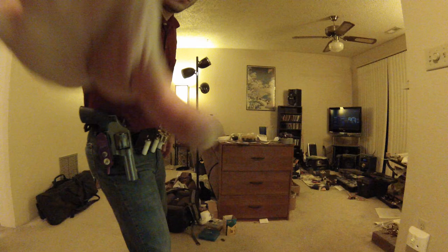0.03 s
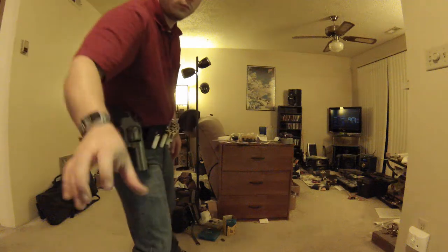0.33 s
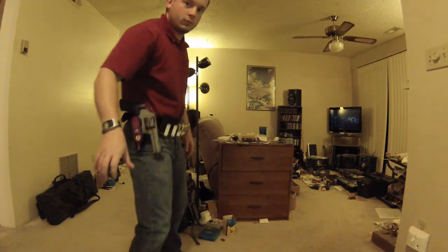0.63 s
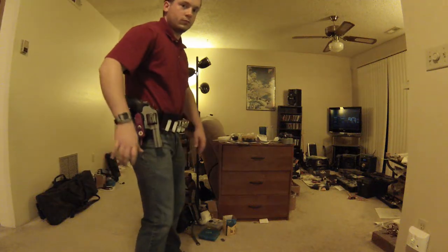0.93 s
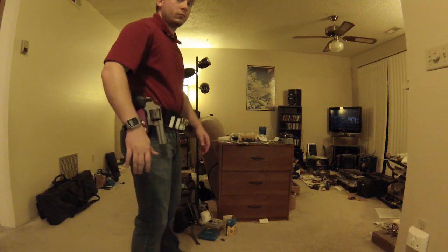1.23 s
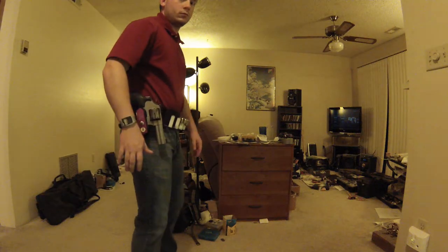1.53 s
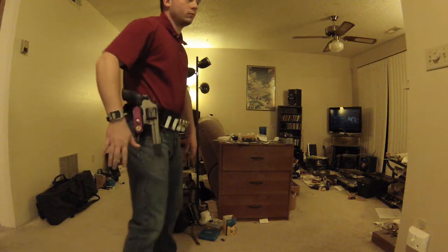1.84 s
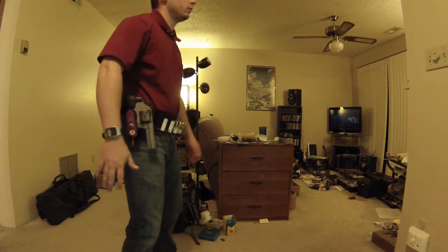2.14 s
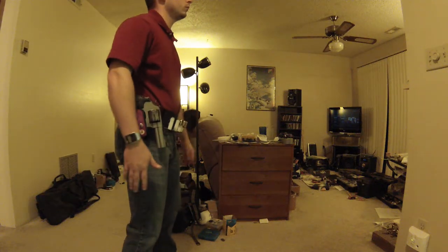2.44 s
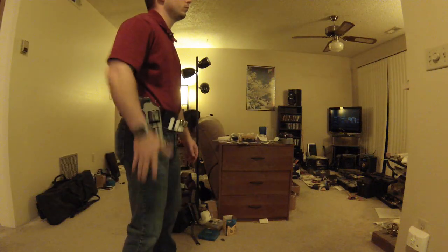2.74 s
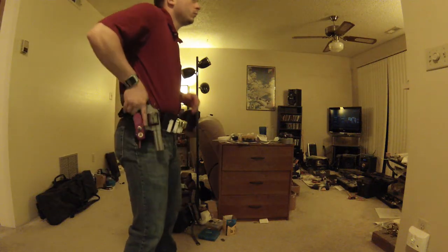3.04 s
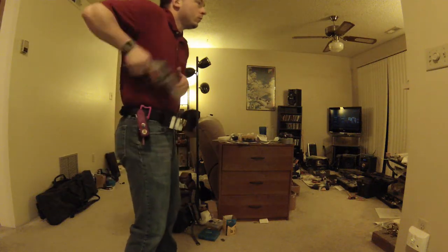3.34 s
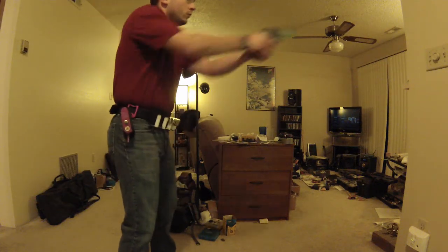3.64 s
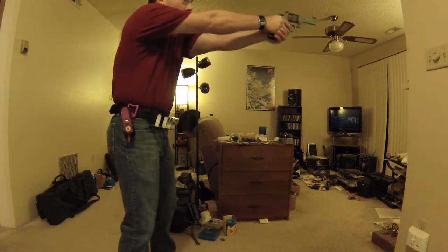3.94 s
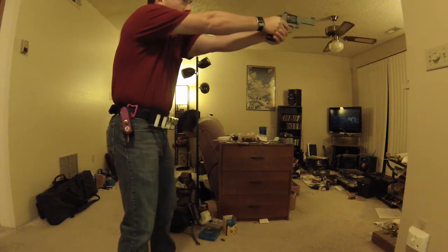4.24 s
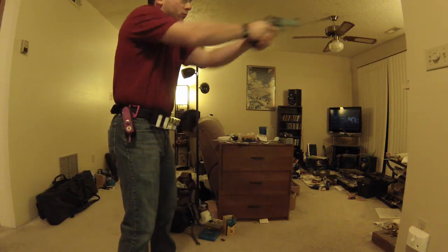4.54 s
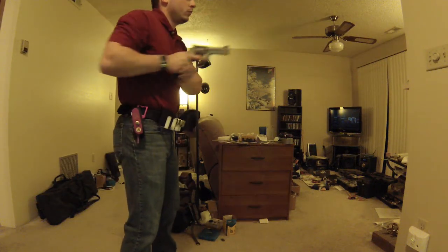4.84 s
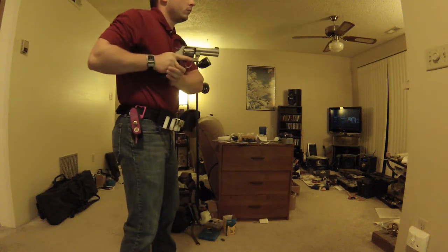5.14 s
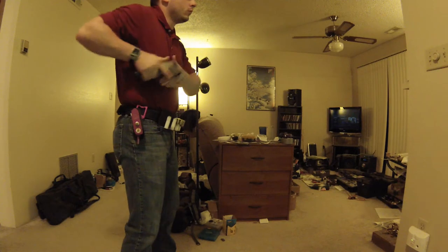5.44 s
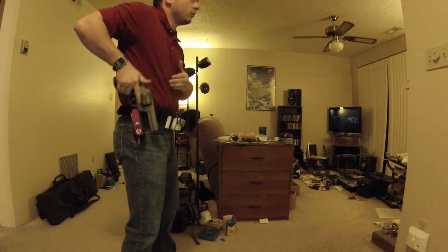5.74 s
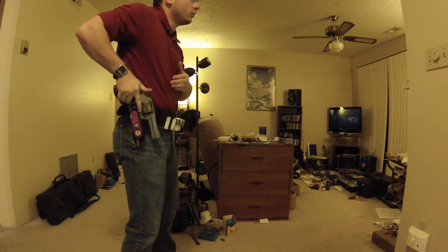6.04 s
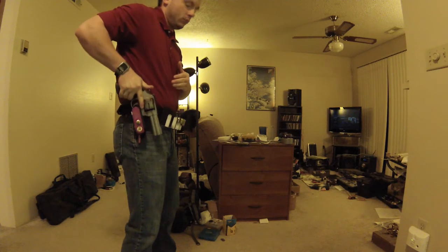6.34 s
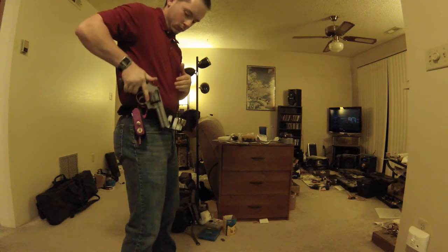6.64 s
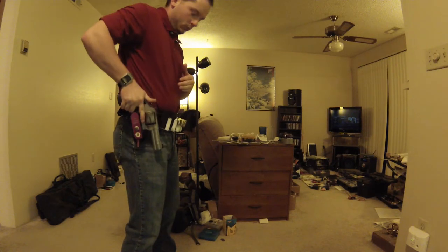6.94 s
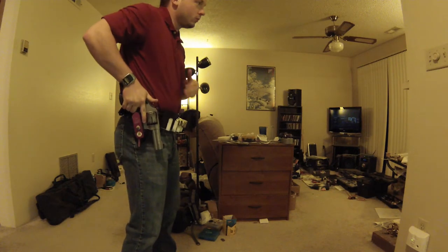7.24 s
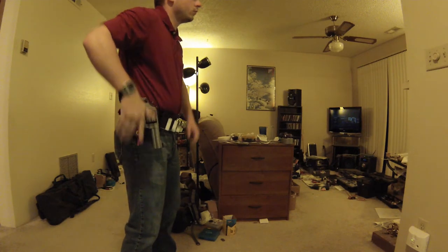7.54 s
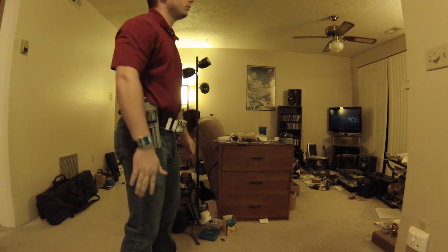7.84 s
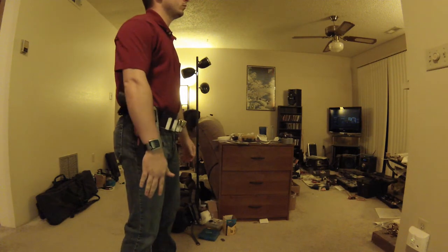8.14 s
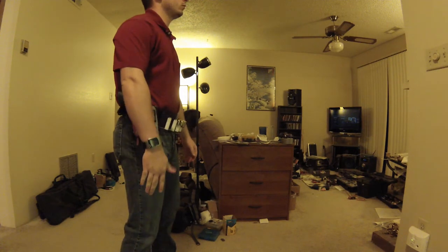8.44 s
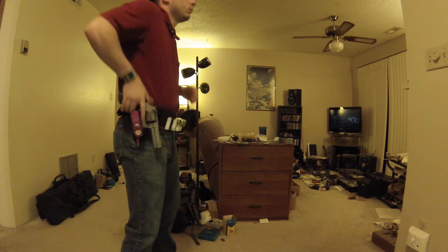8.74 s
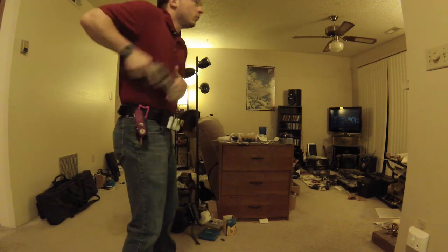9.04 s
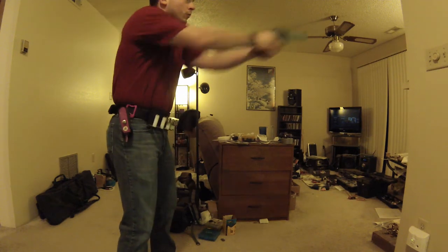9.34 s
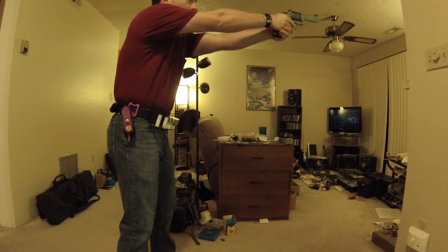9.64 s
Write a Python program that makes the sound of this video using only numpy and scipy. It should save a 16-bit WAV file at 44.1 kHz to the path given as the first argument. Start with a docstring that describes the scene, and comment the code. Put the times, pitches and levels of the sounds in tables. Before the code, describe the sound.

A quiet carpeted living room gives a steady low rumble under faint hiss and a thin electronic whine. In the first two seconds the microphone's stand wobbles with a very deep shudder and ticks twice, clothing brushes, and a few soft footsteps thud through the floor. At about 3.2 seconds a catch snaps open and a revolver scrapes briefly and clacks out of a hard holster. At 4.0 and 4.3 seconds it is dry-fired twice: sharp metallic clicks, the clearest sounds here, each with a short steel ring, a slight room echo and a fainter click of the trigger returning. The gun clacks against the holster at 5.8 and 6.4 seconds, then is pushed home with a quick cluster of light knocks from 6.8 to 7 seconds. Only the background remains until about 9 seconds, when the catch pings and the gun clacks out again.

```python
"""A quiet carpeted living room rumbles under the hiss and thin whine of a camera's electronics.
At first the camera stand sways from a touch, ticks, and thuds softly as steps shake the floor; cloth brushes.
Near 3 s a catch snaps open and a revolver scrapes and clacks out of a hard holster, ringing its shell.
Just after 4 s it is dry-fired twice: the lock clicks, and each hammer fall sets the steel frame ringing.
From about 6 s it is knocked home into the holster, and near 9 s it is drawn again."""
import sys
import numpy as np
from scipy import signal
from scipy.fft import rfft, irfft, next_fast_len
from scipy.io import wavfile
from scipy.ndimage import uniform_filter1d

SR = 44100
rng = np.random.default_rng(int(sys.argv[2]) if len(sys.argv) > 2 else 0)


def store_wav(level_fs):
    """Save 16-bit WAV to argv[1]."""
    pcm = np.round(np.clip(np.atleast_2d(level_fs), -1, 1) * 32767)
    wavfile.write(sys.argv[1], SR, pcm.T.astype(np.int16))


N = 426888
TIME = np.arange(N) / SR
HIT_TIME = TIME[:SR // 2]
START_S, CUTOFF_HZ = .1055, 15300

# noise spectra of room, electronics and cloth: (frequency [Hz], relative density [dB])
RUMBLE_SPECTRUM = [(12, -23), (20, 0), (65, -4), (72, -8), (81, -9.5), (109, -12), (162, -13), (185, -16),
                   (682, -25), (730, -24.5), (1200, -32), (1560, -80), (2640, -120)]
HISS_SPECTRUM = [(600, -9), (1200, 2), (2400, 0), (4500, -2.5), (6000, -2.5), (9000, -5.5), (10600, -6),
                 (11300, -1.5), (12700, -10), (13500, -5), (15200, -12)]
CLOTH_SPECTRUM = [(120, 3.5), (300, 3.5), (550, 4), (900, -7.5), (2000, -21), (6000, -19), (14000, -33)]
RUMBLE_DB, HISS_DB = -60.5, -68.5
# tones of the electronics: (frequency [Hz], rms wander [Hz], level [dB])
WHINE_TONES = [(4376, 2, -90.5), (11080, 16, -90), (12558, 4, -94), (13067, 5, -84), (13127, 6, -87.5)]
# likeness of the two channels in noise and in reverberation: (frequency [Hz], correlation [0-1])
NOISE_COHERENCE = [(100, 1), (350, 0.99), (1400, 0.9), (3000, 0.75), (6000, 0.6), (10000, 0.56),
                   (13000, 0.87)]
REVERB_COHERENCE = [(1000, 1), (2500, 1), (6000, 1), (10000, 1), (14000, 0.96)]
# early reflections from ceiling, walls and dresser: (delay [s], relative gain [ratio])
REFLECTIONS = [(.0056, 0.39), (.0069, 0.3), (0.012, .6), (0.0177, 0.089)]
# reverberation time of the room: (frequency [Hz], t60 [s])
REVERB_TIMES = [(1000, 0.47), (1900, 0.44), (2500, 0.39), (5000, 0.36), (9000, 0.23), (15000, 0.11)]
# movements of shirt and sleeve: (time [s], length [s], level [dB])
CLOTH_MOVES = [(0, 0.53, -69), (.8, 0.31, -73.5), (3.05, 0.17, -79.5)]
CLOTH_ATTACK_S, CLOTH_T60_S = 0.12, 2.3

# jolts that set the stand nodding: (time [s], peak level [dB])
STAND_JOLTS = [(0.103, -40.5), (.957, -38), (1.859, -42.5)]
ROCK_DB, ROCK_MODE, NOD_MODE = -25, (28.44, 5.2), (44.8, 2.16)   # modes: (frequency [Hz], t60 [s])
# steps felt through the floor: (time [s], relative level [dB], extra gain of the highest mode [dB])
FLOOR_THUDS = [(0.738, -39, -6), (0.763, -44.5, -1), (.963, -40.5, -5.5), (1.47, -52.5, -8),
               (1.758, -40.5, -13.5), (1.876, -50, 3.5)]
# ticks of the settling stand: (time [s], relative level [dB])
STAND_TICKS = [(0.395, -54), (0.8725, -58.5)]
THUD_RISE_S, TICK_CHATTER_S = 0.01, .003

# normal modes of the stand's legs and ticking parts, the holster's shell and catch spring,
# and the revolver's lock and frame: (frequency [Hz], relative level [dB], t60 [s])
LEG_MODES = [(100.2, -10.5, 0.92), (141.2, 2.5, 0.15), (161.4, 5, 0.45)]
TICK_MODES = [(1390, -2, .025), (1580, -2, .025), (1800, 1, .025)]
SHELL_MODES = [(1520, -11, .04), (2100, 0, .07), (2230, -3, .05), (2400, -1, .08), (2520, -2, .07),
               (3100, -7, .04), (3700, -10, .035), (6100, -9, .04), (6350, -6.5, .04), (7750, -7.5, .06)]
SPRING_MODES = [(2026, -3, .07), (3070, 0, 0.078), (3150, -8, 0.031), (5400, -15, 0.027),
                (5880, -4.5, 0.04), (6150, 1, 0.016), (6630, -3, .02), (7950, -9, .04)]
LOCK_MODES = [(2372, 1, 0.024), (2574, -2.5, 0.034), (2860, -9, .03), (4380, -8, .05), (5050, -6, .04),
              (5170, -9, .05), (6020, -5, .06)]
FRAME_MODES = [(1600, -1, .16), (1766, -1.5, .32), (2024, -3.5, .25), (2353, -2.5, .18), (2510, -6, .15),
               (3000, -5, .2), (3520, -10, .15), (3860, -12, .2), (4188, -5, .22), (5378, -10, .18),
               (5975, -7, .15), (6444, -4, .13), (7690, -4, .11), (10790, -8, .13)]
# spectra of each contact's crack and of sliding friction: (frequency [Hz], relative density [dB])
TICK_CRACK = [(500, -14), (1300, -3), (1750, 0), (2300, -16), (8000, -30)]
SHELL_CRACK = [(300, -18), (1100, -6.5), (1800, 0.5), (2150, -4.5), (2550, 1), (2850, 1), (3200, 2),
               (4500, -5.5), (6300, -4), (9000, -14.5), (15000, -24)]
SPRING_CRACK = [(300, -12), (1100, -6), (2100, 2), (2600, 1), (5000, -7), (6250, 0.5), (7200, -4),
                (11000, -7), (15000, -21)]
LOCK_CRACK = [(300, -28), (1600, -10), (2000, 0), (2450, 1), (3100, -3), (4400, 2), (6100, 4), (8000, -2),
              (9200, -7), (15000, -22)]
STEEL_CRACK = [(300, -17), (800, -20), (1300, -4.5), (1750, 1.5), (2350, 4.5), (2750, -0.5), (4300, 0.5),
               (5200, -1.5), (6300, 2), (7100, -5), (7700, 1.5), (8600, -7.5), (12000, -8), (15000, -20)]
SCRAPE_SPECTRUM = [(500, -12), (1400, 1), (2100, 4.5), (3400, -6), (4400, -16), (6300, 0), (9000, -10),
                   (15000, -34)]

# steel rubbing along the shell: (time [s], length [s], level [dB], favoured frequency [Hz])
HOLSTER_SCRAPES = [(3.201, .04, -79, 2900), (3.272, 0.064, -76, 2450), (6.403, .036, -76, 3000),
                   (6.911, 0.033, -78, 2500), (8.998, .032, -79, 3450)]
# the catch opening at each draw: (time [s], relative level [dB])
CATCH_RELEASES = [(3.2205, -55), (8.9497, -46)]
SLIPS_PER_S, CATCH_CHATTER_S = 1500, 0.0023
# the gun touching both walls of the holster's mouth: (second contact time [s], relative level [dB],
# first against second [dB], tilt [dB/octave], second's favoured frequency [Hz], its width [octaves])
MOUTH_CLACKS = [(3.303, -50, -2, 3, 2150, .15), (5.7735, -49, -4, 3, 2400, .15),
                (6.4254, -52.5, -4, -1, 2850, 0.61), (9.0016, -48, -.5, 0, 2440, 0.1)]
CLACK_GAP_S, CLACK_CHATTER_S, FIRST_WALL_HZ, FIRST_WALL_OCTAVES = 0.011, 0.006, 2090, .1
# the gun being pushed home:
# (time [s], relative level [dB], tilt [dB/octave], crack against ring [dB], favoured frequency [Hz])
SEATING_KNOCKS = [(6.7735, -50.5, -2.5, 6, 2140), (6.818, -53, -2, 1, 2240), (6.8465, -45, -3.5, -2, 2140),
                  (6.8525, -50.5, -1.5, -2, 2270), (6.9185, -53, -8, -7, 2530),
                  (6.9465, -49, 0.5, 12, 2450)]
KNOCK_CHATTER_S, GRIPPED_T60_SHARE = 0.0045, 0.5
SLIDE_IN_S = 0.0011   # sliding into a contact softens its attack

# double-action pulls: (hammer fall time [s], relative level [dB], cylinder stop against hammer [dB],
# sear against hammer [dB], trigger held [s], tilt [dB/octave], favoured low and high frequency [Hz])
TRIGGER_PULLS = [(4.0303, -41.5, -11, -8, .123, -0.4, 2020, 6440),
                 (4.308, -40.6, -6.5, -2, .103, 0.45, 2370, 7690)]
STOP_LEAD_S, SEAR_LEAD_S, SEAR_HZ = 0.013, .0062, 2440
REBOUND_S, REBOUND_DB, RETURN_DB = 0.0048, -9, -16.5
# contacts within the lock: (tilt [dB/octave], chatter time [s])
STOP_CONTACT, SEAR_CONTACT = (2.1, 0.0032), (-5.5, 0.0033)
HAMMER_CONTACT, REBOUND_CONTACT, RETURN_CONTACT = (0, 0.017), (1.5, 0.0051), (1.5, 0.0073)


def from_db(db):
    """Amplitude grows tenfold for every 20 dB."""
    return 10 ** (np.asarray(db) / 20)


def unit_rms(x):
    """Normalisation to unit mean power."""
    return x / np.sqrt(np.mean(x ** 2) + 1e-30)


def unit_energy(x):
    """Normalisation to the energy of a unit impulse."""
    return x / np.sqrt(np.sum(x ** 2) + 1e-30)


def at_hz(points, hz):
    """Linear interpolation on a log-frequency axis."""
    known_hz, value = np.transpose(points)
    return np.interp(np.log(np.maximum(hz, 1)), np.log(known_hz), value)


def bell(hz, centre_hz, octaves):
    """Gaussian weighting in log frequency, 1 at its centre."""
    return np.exp(-(np.log2(np.maximum(hz, 1) / centre_hz) / octaves) ** 2)


def decay(t, t60):
    """Exponential decay, 60 dB in t60."""
    return np.exp(-np.log(1000) * t / max(t60, 1e-4))


def mode(t, hz, t60):
    """Free vibration of a damped harmonic oscillator."""
    return np.sin(2 * np.pi * hz * t) * decay(t, t60)


def bins(size):
    """Frequencies of the discrete Fourier transform."""
    return np.arange(size // 2 + 1) * SR / size


def colour(x, gain_db):
    """Minimum-phase filtering: folding the cepstrum makes the response causal."""
    size = len(x)
    cepstrum = irfft(np.log(from_db(gain_db)), size)
    cepstrum[1:size // 2] *= 2
    cepstrum[size // 2 + 1:] = 0
    return irfft(rfft(x) * np.exp(rfft(cepstrum)), size)


def stereo_noise(spectrum=None, coherence=NOISE_COHERENCE, size=N):
    """Partial coherence: two channels share one noise and take another in opposite phase."""
    padded = next_fast_len(size, True)
    hz = bins(padded)
    mid, side = rfft(rng.standard_normal((2, padded)))
    alike = np.clip(at_hz(coherence, hz), 0, 1)
    pair = np.sqrt(1 + alike) * mid + np.sqrt(1 - alike) * side * [[1], [-1]]
    gain = 1 if spectrum is None else from_db(at_hz(spectrum, hz))
    return unit_rms(irfft(pair * gain, padded)[:, :size])


def add(out, s, sound):
    """Superposition of a sound that begins at time s."""
    start = int(np.clip(s * SR, 0, N - 1))
    out[start:start + len(sound)] += sound[:N - start]


def impacts(events, modes, crack, crack_db, gain_db, favour_db=0, favour_octaves=1, rise_s=0):
    """Impact excitation: hard faces chatter briefly and leave the body's normal modes ringing."""
    out, t, hz = np.zeros(N), HIT_TIME, bins(len(HIT_TIME))
    octaves = np.log2(np.clip(hz, 1000, 10000) / 3000)
    for s, db, tilt, chatter_s, *favoured_hz in events:
        chatter = rng.standard_normal(len(t)) * np.exp(-t / chatter_s)
        snap = unit_energy(colour(chatter, at_hz(crack, hz)))
        signs = rng.choice([-1, 1], len(modes))
        ring = sum(sign * from_db(mode_db) * unit_energy(mode(t, f, t60))
                   for sign, (f, mode_db, t60) in zip(signs, modes))
        # harder contacts are brighter, and the struck spot may favour some modes
        favour = favour_db * sum(bell(hz, f, favour_octaves) for f in favoured_hz)
        hit = colour(unit_energy(ring) + from_db(crack_db) * snap, tilt * octaves + favour)
        attack = 1 - np.exp(-t / max(rise_s, 1e-6))
        add(out, s, from_db(db + gain_db) * unit_energy(hit * attack))
    return out


def room_rumble():
    """Stationary noise with its power at low frequencies."""
    return from_db(RUMBLE_DB) * stereo_noise(RUMBLE_SPECTRUM)


def electronics():
    """Broadband hiss and thin tones under slight random frequency modulation."""
    out = from_db(HISS_DB) * stereo_noise(HISS_SPECTRUM)
    for hz, wander_hz, db in WHINE_TONES:
        pitch = hz + wander_hz * unit_rms(uniform_filter1d(rng.standard_normal(N), size=2000))
        out += from_db(db) * np.sqrt(2) * np.sin(2 * np.pi * np.cumsum(pitch) / SR)
    return out


def living_room(x, direct_db, echo_db, tail_db, build_s, smear_s):
    """Convolution with a room response: direct sound, reflections, a tail that loses treble first."""
    t = HIT_TIME
    diffuse = rfft(stereo_noise(coherence=REVERB_COHERENCE, size=len(t)))
    hz, centres = bins(len(t)), [f for f, _ in REVERB_TIMES]
    tail = 0
    for band, (_, t60) in zip(np.eye(len(centres)), REVERB_TIMES):
        band_gain = at_hz(list(zip(centres, band)), hz)
        tail += irfft(diffuse * band_gain, len(t)) * decay(t, t60)
    build_up = 1 - np.exp(-(t / build_s) ** 2)
    response = from_db(tail_db) * unit_energy(tail * build_up)
    response[:, 0] += from_db(direct_db)
    for delay, gain in REFLECTIONS:   # furniture smears each one
        bounce = unit_energy(rng.standard_normal(len(t)) * np.exp(-t / smear_s))
        response += from_db(echo_db) * gain * np.roll(bounce, int(delay * SR))
    return signal.fftconvolve(x[None], response, axes=1)[:, :N]


def clothing(uneven_db):
    """Friction noise: cloth slides in uneven pulls, and each movement swells, holds and dies away."""
    pulls = unit_rms(uniform_filter1d(rng.standard_normal(N), size=1200))
    motion = np.zeros(N)
    for s, length, db in CLOTH_MOVES:
        swell = np.clip((TIME - s) / CLOTH_ATTACK_S, 0, 1)
        release = decay(np.maximum(TIME - s - length, 0), CLOTH_T60_S)
        motion = np.maximum(motion, from_db(db) * swell * release)
    return motion * from_db(uneven_db * np.tanh(pulls)) * stereo_noise(CLOTH_SPECTRUM)


def stand_sway():
    """Lightly damped bending modes: a touch leaves the stand rocking, and jolts set it nodding."""
    out = np.zeros(N)
    add(out, START_S, from_db(ROCK_DB) * mode(TIME, *ROCK_MODE))
    for s, db in STAND_JOLTS:
        add(out, s, from_db(db) * mode(TIME, *NOD_MODE))
    return out


def floor_thuds(carpet_hz):
    """Structure-borne sound: steps excite the stand's legs, with the carpet as a low-pass filter."""
    out, t = np.zeros(N), TIME[:SR]
    for s, db, top_db in FLOOR_THUDS:
        ring = sum(from_db(mode_db + extra_db) * mode(t, hz, t60)
                   for (hz, mode_db, t60), extra_db in zip(LEG_MODES, (0, 0, top_db)))
        add(out, s, from_db(db) * ring * (1 - np.exp(-t / THUD_RISE_S)))
    return signal.sosfilt(signal.butter(6, carpet_hz, fs=SR, output="sos"), out)


def stand_ticks():
    """Heavily damped modes give small dry ticks as the stand settles."""
    ticks = [(s, db, 0, TICK_CHATTER_S) for s, db in STAND_TICKS]
    return impacts(ticks, TICK_MODES, TICK_CRACK, crack_db=2.0, gain_db=13.5)


def holster_scrapes(favour_db, favour_octaves):
    """Stick-slip friction: steel on the shell gives a dense run of tiny slips that swells and stops."""
    out, t, hz = np.zeros(N), HIT_TIME, bins(len(HIT_TIME))
    for s, length, db, favoured_hz in HOLSTER_SCRAPES:
        slips = rng.standard_normal(len(t)) * (rng.random(len(t)) < SLIPS_PER_S / SR)
        favour = favour_db * bell(hz, favoured_hz, favour_octaves)
        rasp = unit_rms(colour(slips, at_hz(SCRAPE_SPECTRUM, hz) + favour))
        add(out, s, from_db(db) * rasp * np.sin(np.pi * np.minimum(t / length, 1)))
    return out


def holster_catch():
    """Sudden release leaves the catch's steel spring in free vibration."""
    pings = [(s, db, 0, CATCH_CHATTER_S) for s, db in CATCH_RELEASES]
    return impacts(pings, SPRING_MODES, SPRING_CRACK, crack_db=0.0, gain_db=7.5, rise_s=0.00071)


def holster_clacks():
    """Shell resonance: the gun strikes one wall of the mouth, then the other, and both ring freely."""
    walls = []
    for s, db, first_db, tilt, hz, octaves in MOUTH_CLACKS:
        walls.append((s - CLACK_GAP_S, db + first_db, tilt, FIRST_WALL_HZ, FIRST_WALL_OCTAVES))
        walls.append((s, db, tilt, hz, octaves))
    return sum(impacts([(s, db, tilt, CLACK_CHATTER_S, hz)], SHELL_MODES, SHELL_CRACK, crack_db=3.0,
                       gain_db=7.5, favour_db=9.0, favour_octaves=octaves, rise_s=SLIDE_IN_S)
               for s, db, tilt, hz, octaves in walls)


def holster_knocks():
    """Contact damping: the wedged gun shortens the shell's ring as it is knocked home."""
    gripped = [(hz, db, t60 * GRIPPED_T60_SHARE) for hz, db, t60 in SHELL_MODES]
    return sum(impacts([(s, db, tilt, KNOCK_CHATTER_S, hz)], gripped, SHELL_CRACK, crack_db,
                       gain_db=7.5, favour_db=8.5, favour_octaves=0.061, rise_s=SLIDE_IN_S)
               for s, db, tilt, crack_db, hz in SEATING_KNOCKS)


def frame_ring(gain_db, favour_db, favour_octaves):
    """Modal decay of the frame after each hammer fall; each chamber favours its own low and high mode."""
    out = np.zeros(N)
    for s, db, *_, low_hz, high_hz in TRIGGER_PULLS:
        for hz, mode_db, t60 in FRAME_MODES:
            favour = favour_db * (bell(hz, low_hz, favour_octaves) + bell(hz, high_hz, favour_octaves))
            amplitude = rng.choice([-1, 1]) * from_db(db + gain_db + mode_db + favour)
            add(out, s, amplitude * mode(HIT_TIME, hz, t60))
    return out


def dry_fire():
    """A chain of impacts: the cylinder locks, the sear slips, the hammer bounces, the trigger returns."""
    stops, sears, blows = [], [], []
    for s, db, stop_db, sear_db, held_s, tilt, low_hz, high_hz in TRIGGER_PULLS:
        stops.append((s - STOP_LEAD_S, db + stop_db, *STOP_CONTACT))
        sears.append((s - SEAR_LEAD_S, db + sear_db, *SEAR_CONTACT, SEAR_HZ))
        steps = [(0, 0, HAMMER_CONTACT, low_hz),
                 (REBOUND_S, REBOUND_DB, REBOUND_CONTACT, high_hz),
                 (held_s, RETURN_DB, RETURN_CONTACT, low_hz)]
        for lag_s, step_db, (step_tilt, chatter_s), hz in steps:
            blows.append((s + lag_s, db + step_db, tilt + step_tilt, chatter_s, hz))
    return (impacts(stops, LOCK_MODES, LOCK_CRACK, crack_db=2.0, gain_db=13.5)
            + impacts(sears, LOCK_MODES, LOCK_CRACK, crack_db=0.0, gain_db=14.0,
                      favour_db=6.0, favour_octaves=0.21, rise_s=0.0014)
            + impacts(blows, LOCK_MODES, STEEL_CRACK, crack_db=23.0, gain_db=12.3,
                      favour_db=4.5, favour_octaves=.2))


def scene():
    """Superposition: lock and holster reverberate in the room, and all other sounds add directly."""
    lock = living_room(dry_fire(), direct_db=9.5, echo_db=1.0, tail_db=6.0, build_s=0.003, smear_s=0.0013)
    holster = holster_knocks() + holster_clacks() + holster_catch()
    holster += holster_scrapes(favour_db=9.0, favour_octaves=.16)
    holster = living_room(holster, direct_db=9.0, echo_db=5.5, tail_db=4.0, build_s=0.0036, smear_s=0.0012)
    frame = frame_ring(gain_db=-15.5, favour_db=6.0, favour_octaves=.13)
    stand = stand_sway() + floor_thuds(carpet_hz=191) + stand_ticks()
    background = clothing(uneven_db=4.0) + room_rumble() + electronics()
    return background + stand + holster + frame + lock


def record(dry):
    """Gating and band limiting: the sound switches on at START_S, and a steep low-pass cuts the top."""
    low_pass = signal.ellip(12, .1, 80, CUTOFF_HZ, fs=SR, output="sos")
    return signal.sosfilt(low_pass, dry * (TIME >= START_S))


dry = scene()
out = record(dry)
store_wav(out)
```